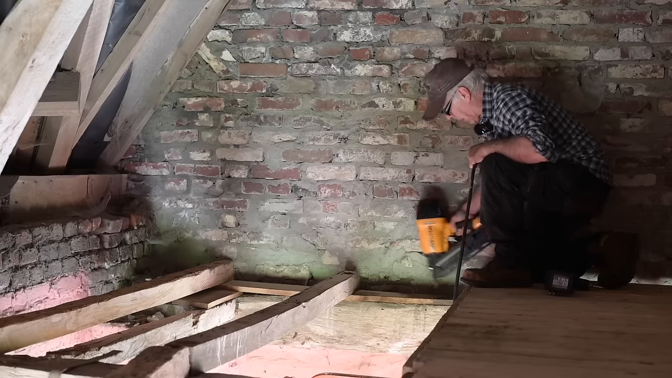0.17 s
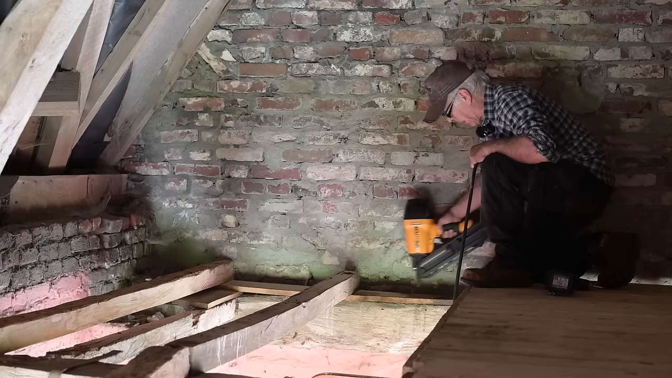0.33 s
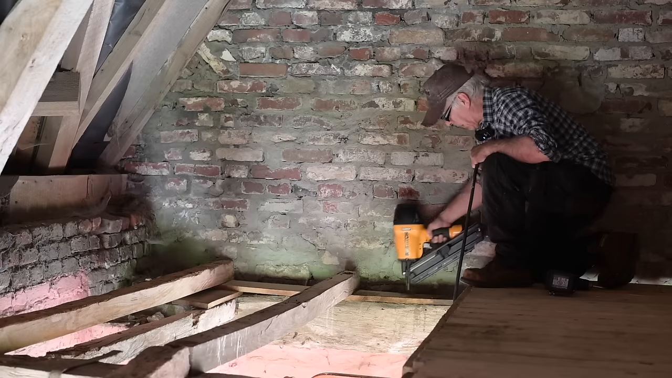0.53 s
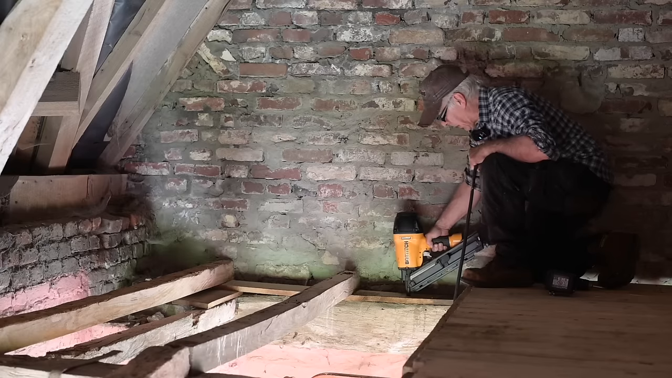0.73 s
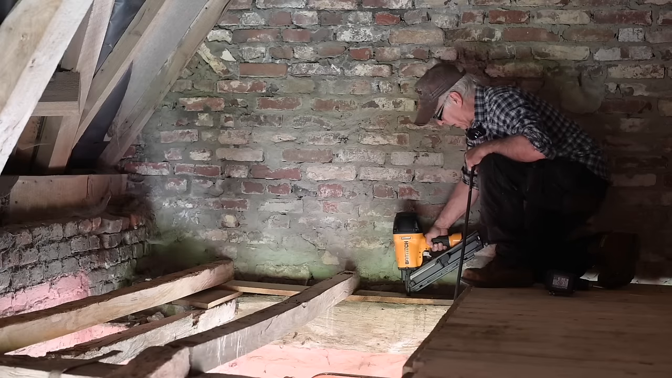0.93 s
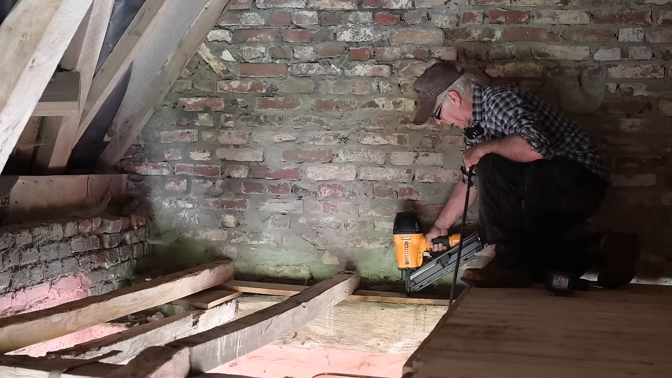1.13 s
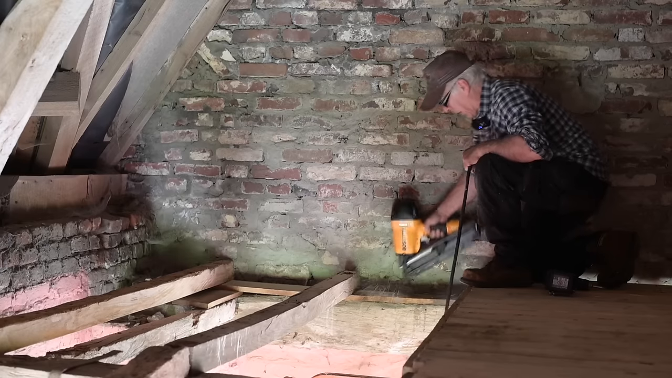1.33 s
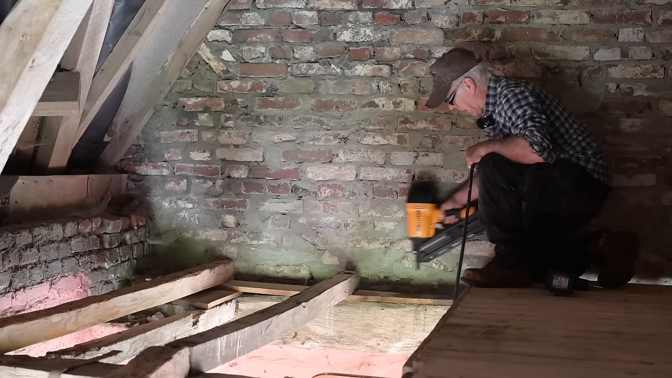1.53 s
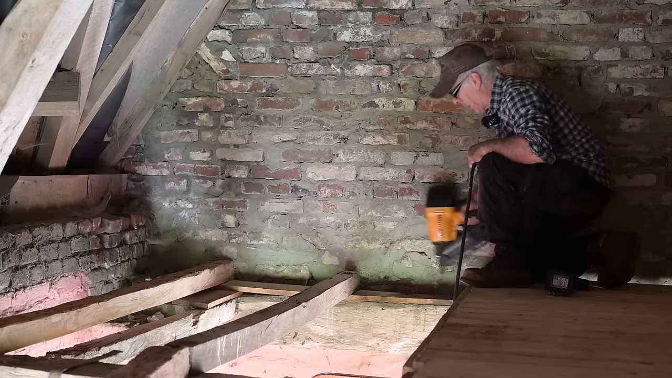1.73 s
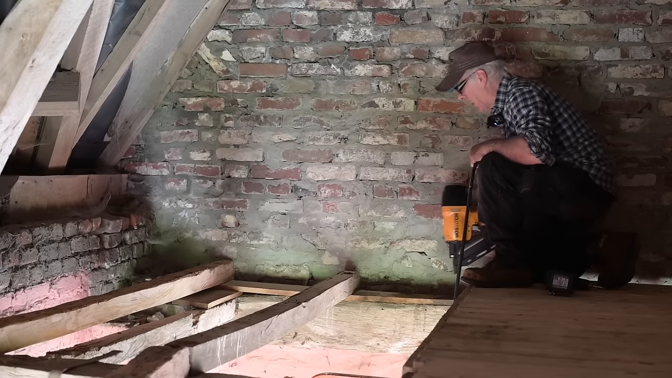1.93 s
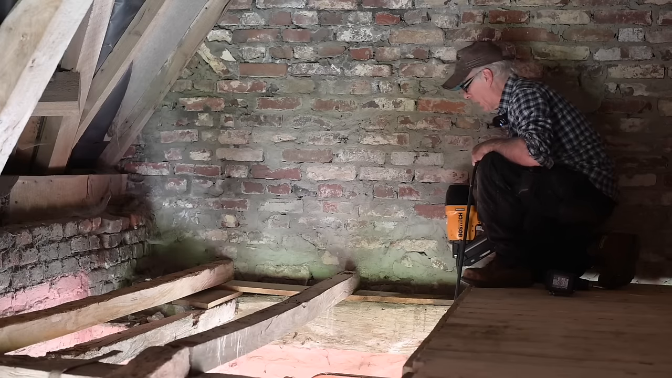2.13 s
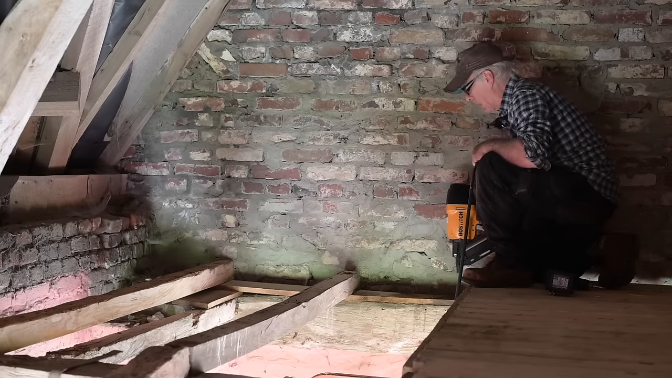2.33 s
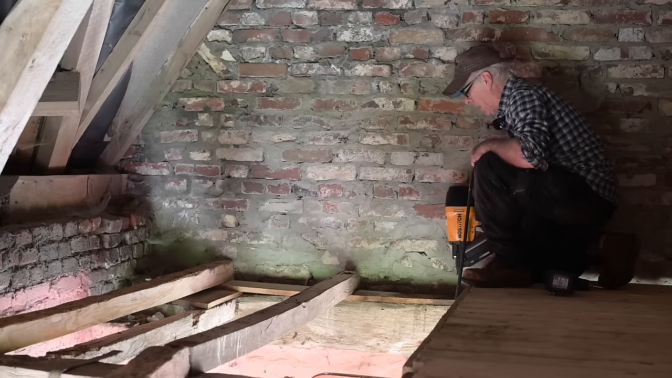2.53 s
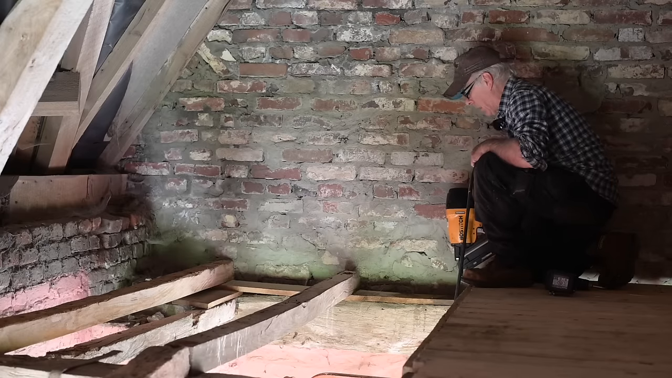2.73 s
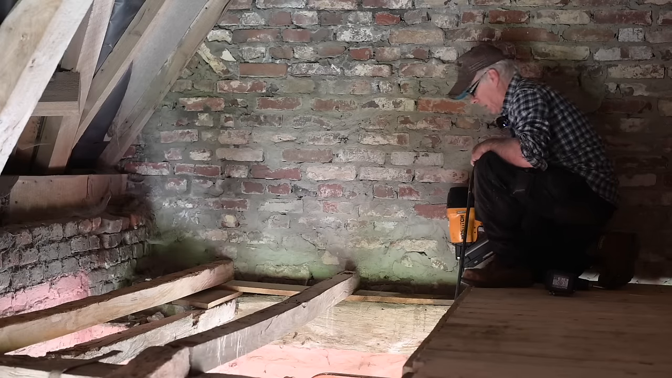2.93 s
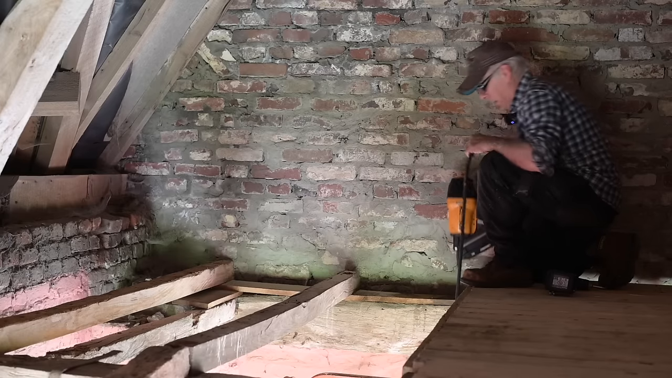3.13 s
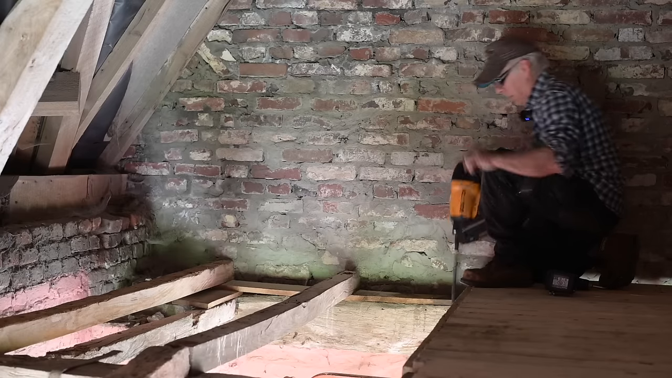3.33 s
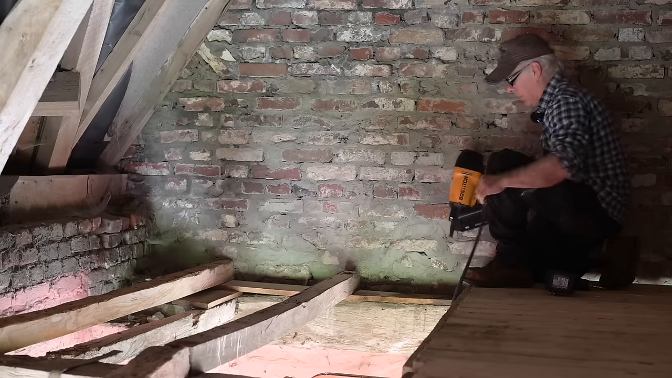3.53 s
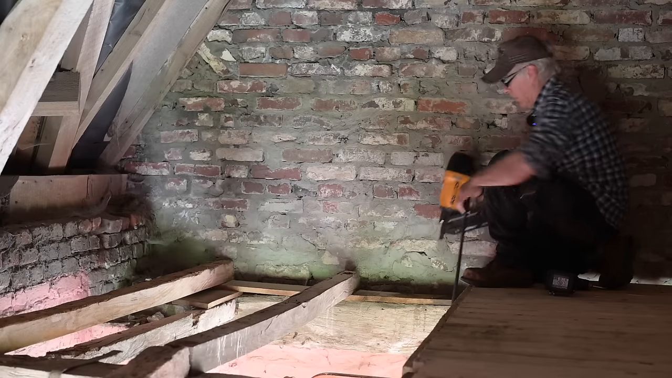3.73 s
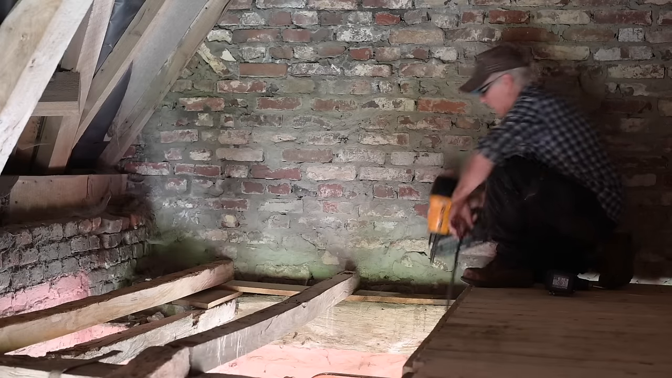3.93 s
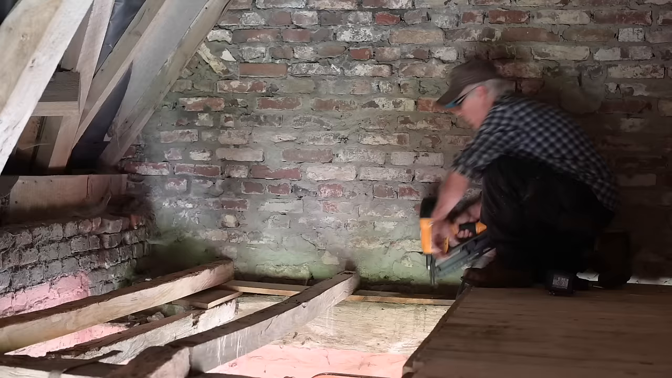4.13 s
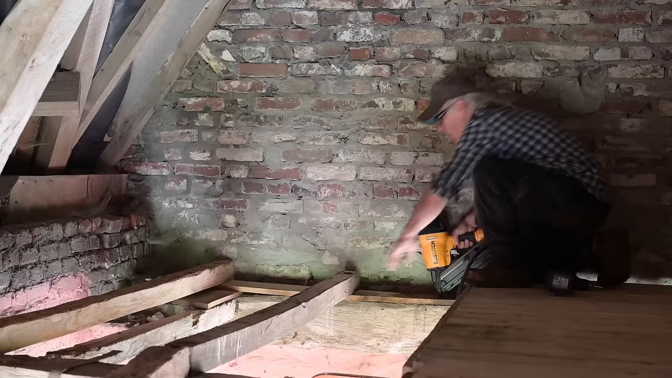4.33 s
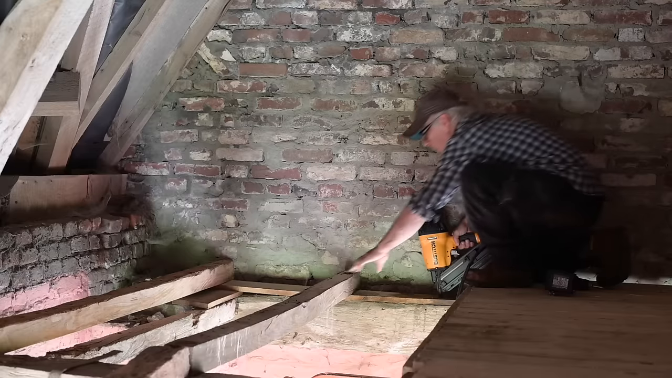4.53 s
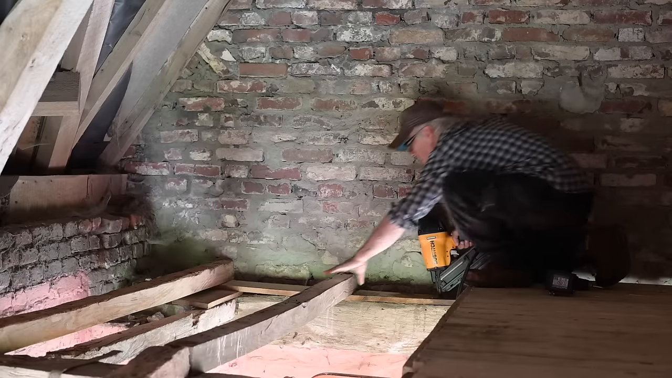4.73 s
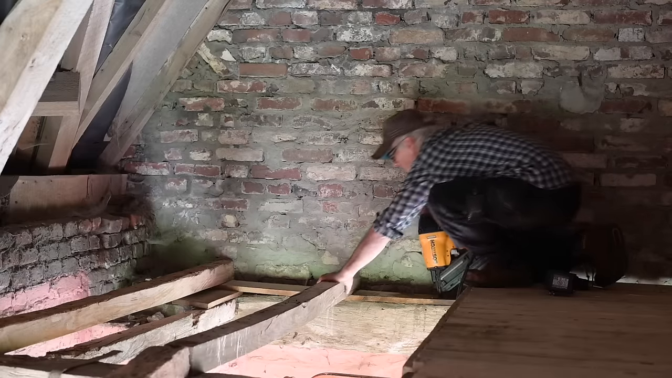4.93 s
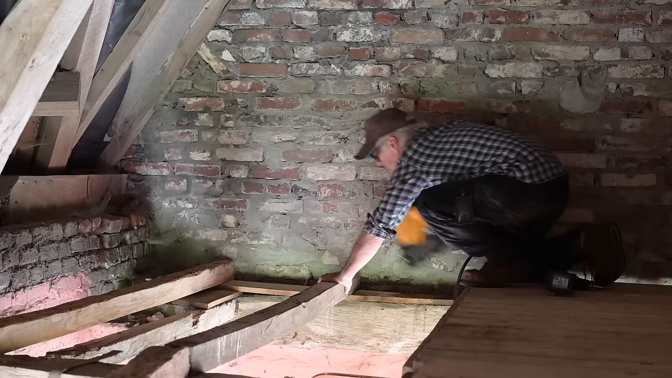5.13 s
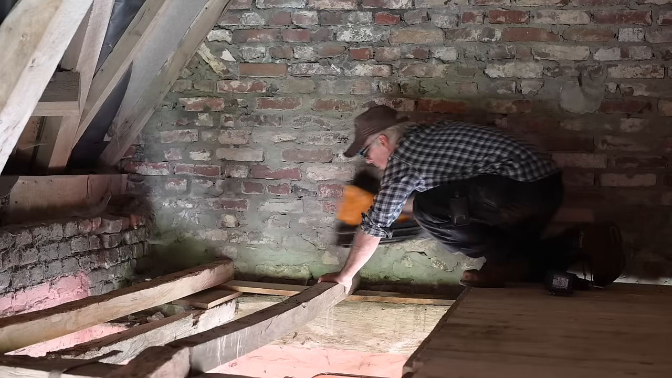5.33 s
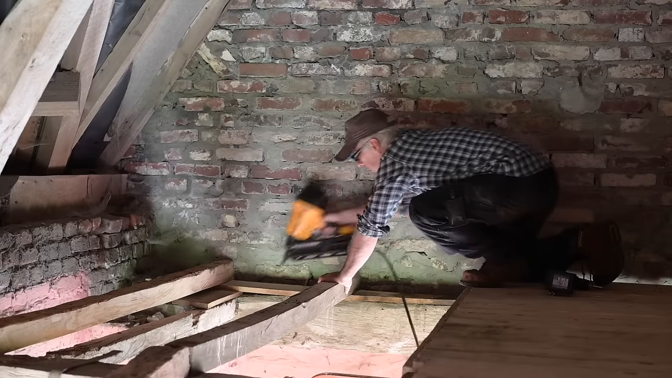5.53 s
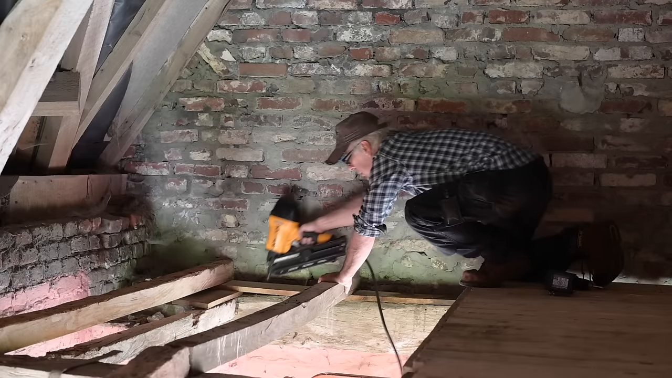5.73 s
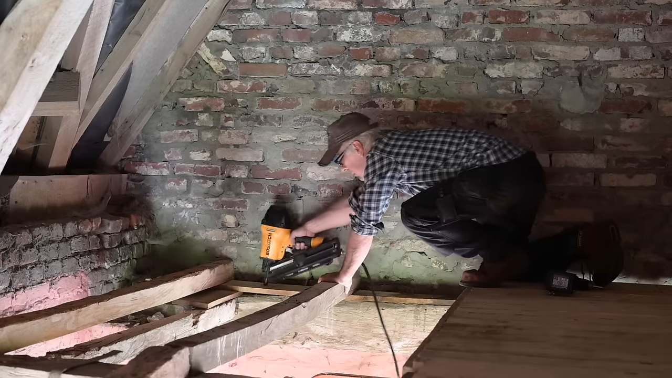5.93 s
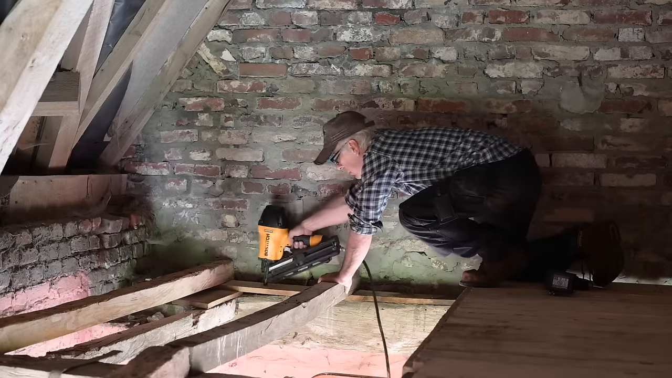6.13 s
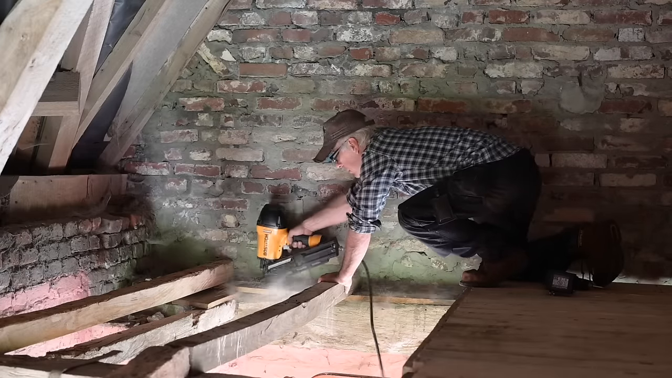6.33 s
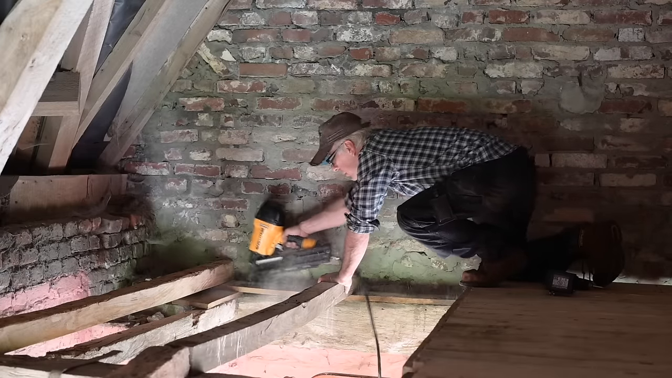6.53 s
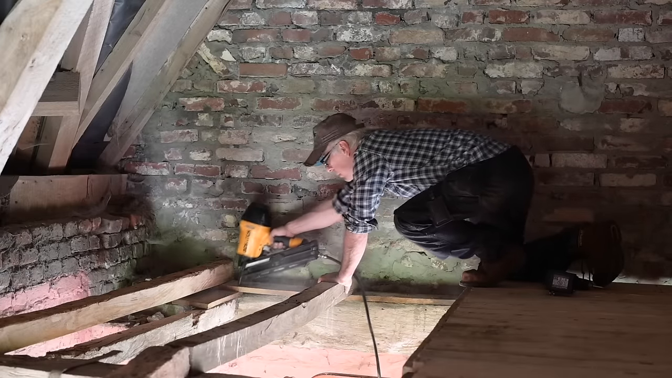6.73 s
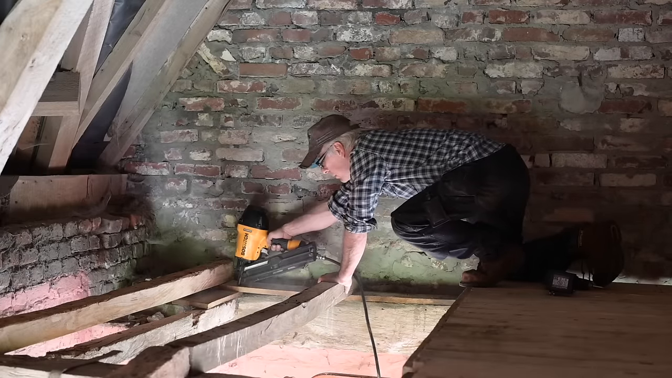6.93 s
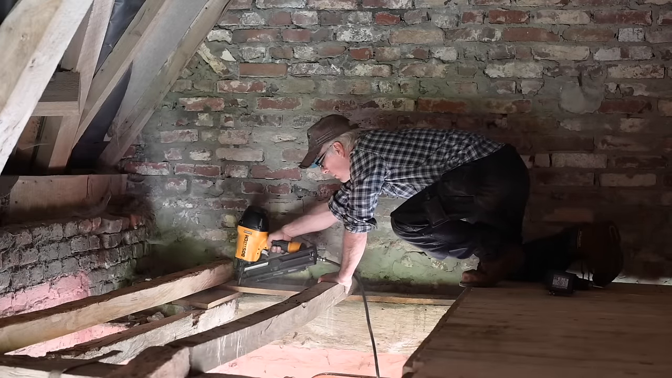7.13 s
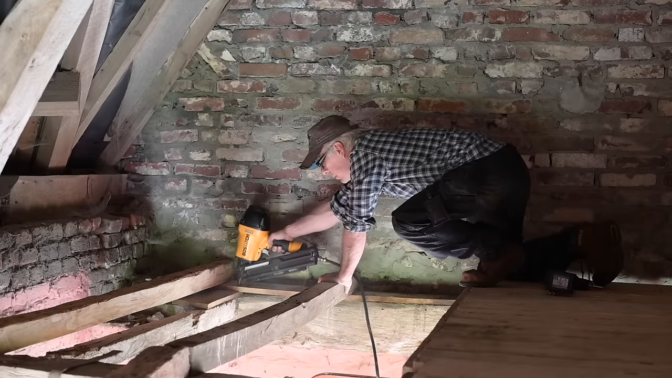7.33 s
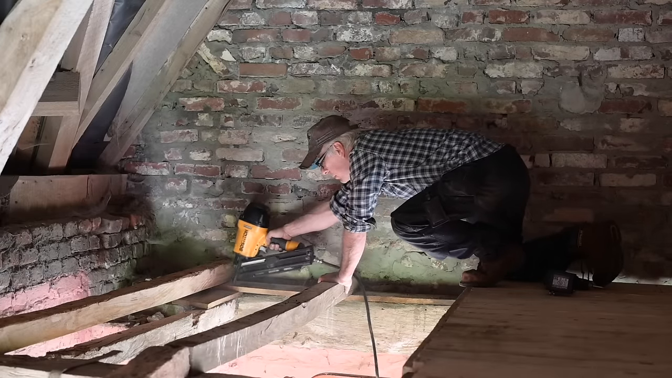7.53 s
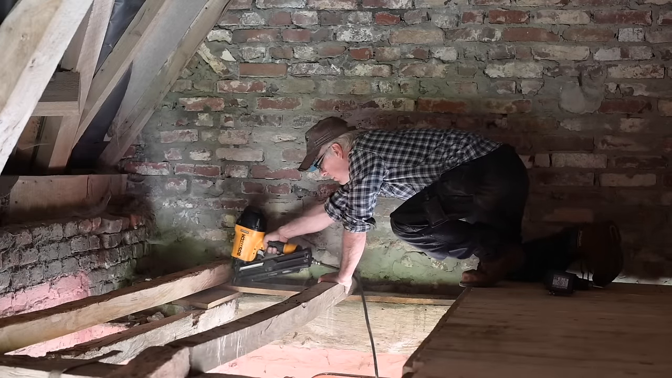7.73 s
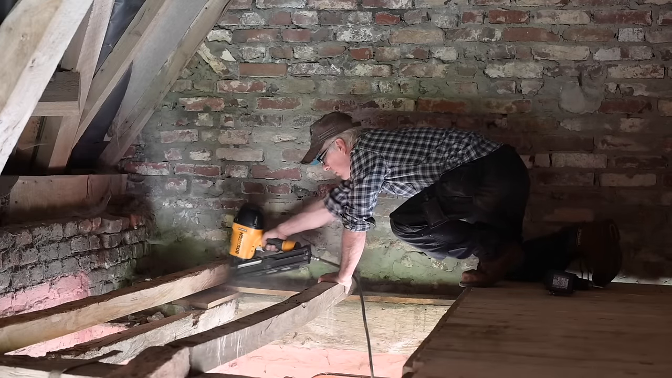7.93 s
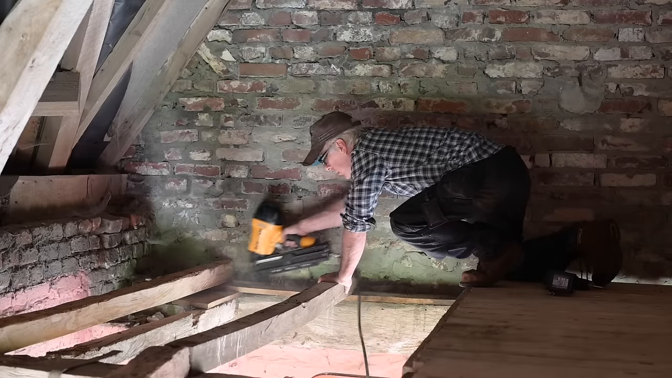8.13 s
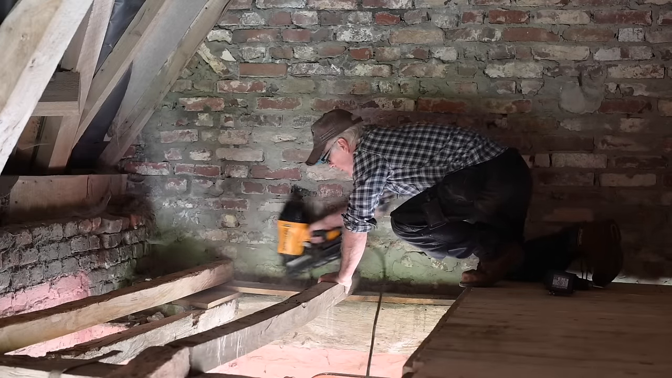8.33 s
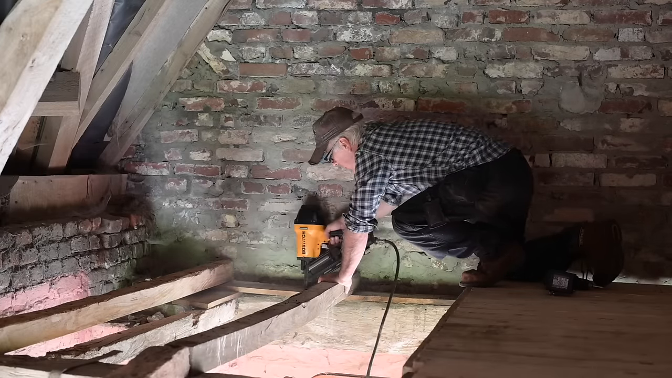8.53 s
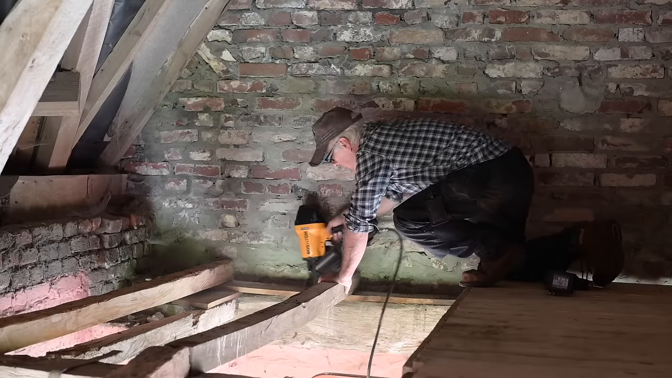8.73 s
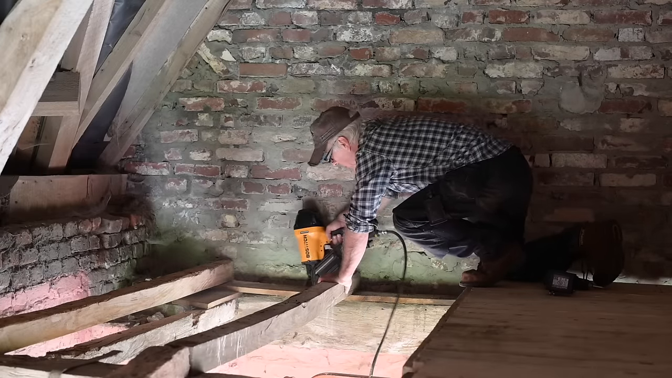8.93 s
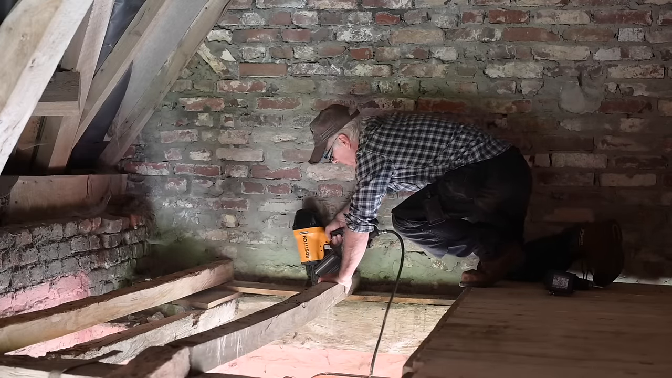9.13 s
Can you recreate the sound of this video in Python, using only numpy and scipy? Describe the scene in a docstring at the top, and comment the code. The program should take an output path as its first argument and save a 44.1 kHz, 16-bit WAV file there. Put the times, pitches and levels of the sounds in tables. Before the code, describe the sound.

Pneumatic nailer fires three overloaded, booming shots into timber in a brick loft, with wood knocks, steel clicks and a faint compressor drone between.

```python
"""A pneumatic nailer fires into roof timbers in a brick loft; its blows, booms and air blasts overload the input.
Between shots its nose and magazine land on wood, and loose parts click: shaped noise rings planks and steel.
Soft floor bumps and rustling cloth are noise bursts and swells.
A piston machine, probably the air compressor, drones as a comb of shaft orders over a faint whistling hiss."""
import sys
import numpy as np
from scipy import signal
from scipy.fft import rfft, irfft, next_fast_len
from scipy.io import wavfile
from scipy.ndimage import map_coordinates

SR = 44100
rng = np.random.default_rng(int(sys.argv[2]) if len(sys.argv) > 2 else 0)


def generate_wav(sig):
    """Save sig (samples, or channels by samples) to the path in sys.argv[1] as 16-bit PCM at SR."""
    pcm = np.round(np.clip(np.atleast_2d(sig).T, -1, 1) * 32767).astype(np.int16)
    wavfile.write(sys.argv[1], SR, pcm)


N = 408366
LEAD = SR  # samples kept ahead of time zero, for sounds that are already ringing
AGE = np.arange(SR) / SR  # seconds since a blow
SHORT = 2 ** 14  # samples that hold one blow and its ringing

# nailer shots: t/s, driver blow level/dB, timber boom level/dB, boom centre f/Hz, joist thud level/dB,
# ring time ratio, room level/dB, piston return delay/s, return level/dB
SHOT_EVENTS = [(-.135, 5, 3, 957, -2, 1.16, -14.5, 0.065, 2), (1.2293, 3, 2.5, 450, -4, 0.73, -17, .065, 1),
               (6.2226, 0, 11, 488.4, -7, 0.86, -14, .07, 2),
               (7.862, -0.5, 9.5, 1030, -8, 1.03, -14.5, 0.077, 0.5)]
# spectrum of a plank's knock: f/Hz, relative level/dB
KNOCK_SPECTRUM = [(60, -35), (200, -7), (400, 1.5), (900, -0.5), (1500, -11), (4000, -34.5)]
# spectrum of the joists' thud: f/Hz, relative level/dB
THUD_SPECTRUM = [(40, -39), (90, -12), (170, 0.5), (330, -1.5), (480, -8), (750, -14.5), (1500, -35.5)]
# position in the loft: t/s, share of the way from the wall out over the beams (0-1)
REACH_POINTS = [(0, .25), (1.3, 0.42), (1.9, 0), (3.2, 0), (4.9, .85), (6.4, 1), (9.26, 0.98)]


def amp(db):
    """Decibels to gain."""
    return 10 ** (np.asarray(db) / 20)


def unit(x):
    """Scale to rms 1."""
    return x / np.sqrt(np.mean(x ** 2) + 1e-20)


def along(points, hz):
    """(Hz, value) points read on a log frequency axis."""
    f, v = np.transpose(points)
    return np.interp(np.log(hz + 1), np.log(f + 1), v)


def curve(rows):
    """(s, value) rows as one value per sample."""
    return np.interp(np.arange(N) / SR, *np.transpose(rows))


def wobble(rate):
    """A random curve with rate knots a second, held in steps of 100 samples."""
    knots = rng.standard_normal(int(N * rate / SR) + 4)
    steps = map_coordinates(knots, [np.arange(0, N, 100) * rate / SR])
    return steps.repeat(100)[:N]


def noise(spectrum, size=SR):
    """Coloured noise of rms 1: the spectrum's levels with random phases."""
    hz = np.fft.rfftfreq(size, 1 / SR)
    phases = np.exp(2j * np.pi * rng.random(len(hz)))
    return unit(irfft(amp(along(spectrum, hz)) * phases, size))


def fade(t60, attack):
    """A quick rise, then an exponential decay; both times in seconds."""
    return np.exp(-np.log(1000) * AGE / t60) * (1 - np.exp(-AGE / attack))


def burst(spectrum, envelope, peak_hz=1000, peak_db=0, q=5):
    """A brief chatter of contact forces rings a body with this spectrum and one outstanding resonance."""
    hz = np.fft.rfftfreq(SHORT, 1 / SR)
    # folding the cepstrum makes the body answer only after the force
    cepstrum = irfft(np.log(amp(along(spectrum, hz))))
    fold = np.r_[1, np.full(SHORT // 2 - 1, 2), np.zeros(SHORT // 2)]
    body = np.exp(rfft(cepstrum * fold))
    damping = 1j * hz * peak_hz / q
    resonance = damping / (peak_hz ** 2 - hz ** 2 + damping)
    force = rng.standard_normal(SHORT) * envelope[:SHORT]
    sound = irfft(rfft(force) * body * (1 + (amp(peak_db) - 1) * resonance))
    # the burst carries the energy of its envelope
    return np.pad(sound, (0, SR - SHORT)) * np.linalg.norm(envelope) / np.linalg.norm(sound)


def ring(modes, life, attack, scatter_db):
    """Struck modes, a little different at every blow; life stretches their decay."""
    hz, db, t60 = np.transpose(modes)[:, :, None]
    size = amp(db + scatter_db * rng.standard_normal(db.shape))
    waves = np.sin(2 * np.pi * (hz * AGE + rng.random(hz.shape))) * fade(t60 * life, attack)
    return (size * waves).sum(0) / np.linalg.norm(size)


def add(track, s, sound):
    """Mix a sound into a track at time s."""
    part = track[LEAD + round(s * SR):][:len(sound)]
    part += sound[:len(part)]


def in_loft(x, wet_db, gap=.006, late_db=-24):
    """The answer of brick and roof: treble dies first and a faint part lingers twice as long."""
    # main decay of the loft: f/Hz, t60/s
    loft_decay = [(60, 0.66), (200, 0.42), (600, 0.47), (1200, 0.43), (2500, .36), (6000, 0.3),
                  (10000, .21), (16000, 0.19)]
    hz, t, z = signal.stft(rng.standard_normal(SR), SR, nperseg=256)
    decay = np.exp(-np.log(1000) * t / along(loft_decay, hz)[:, None])
    tail = signal.istft(z * (decay + amp(late_db) * np.sqrt(decay)), SR, nperseg=256)[1][:SR]
    # the answer swells in after a short gap
    tail = tail * (1 - np.exp(-(AGE / gap) ** 2))
    return x + amp(wet_db) * signal.fftconvolve(x, tail / np.linalg.norm(tail))[:SR]


def shots(drive_delay=.009, vent_peak=0.036, vent_rise=0.023, vent_fall=0.025, bounce=.018, bounce_db=-6):
    """The driver fires, the nail slams into the beam, the air vents and the piston thumps back and bounces."""
    # spectrum of the driver blow: f/Hz, relative level/dB
    blow_spectrum = [(25, -30), (70, -14.5), (200, 8.5), (500, 3.5), (1000, -12), (2000, -16),
                     (8000, -23.5), (16000, -35)]
    # spectrum of the timber's boom: f/Hz, relative level/dB
    boom_spectrum = [(25, -42.5), (80, -19.5), (170, -7.5), (500, 0.5), (1100, -5.5), (1700, -10.5),
                     (4000, -19), (9000, -26), (16000, -44.5)]
    # spectrum of the vented air: f/Hz, relative level/dB
    exhaust_spectrum = [(200, -10.5), (1000, -7), (2200, -2.5), (3500, 3.5), (7500, -0.5), (9800, -4),
                        (11500, -13.5), (16000, -22.5)]
    # beam modes: f/Hz, relative level/dB, t60/s at ring time ratio 1
    timber_modes = [(177, -2, .4), (228, -6, .3), (323, -3, .28), (385, -6, .3), (470, 0, .34),
                    (580, -3, .32), (654, -4, .32), (749, -4, .3), (941, -5, .28), (1082, -3, .3),
                    (1137, -7, .3), (1300, -8, .28), (1600, -11, .24), (1680, -10, .24)]
    exhaust_db = -2.5  # every shot vents the same charge of air
    track = np.zeros(LEAD + N)
    for s, blow_db, boom_db, boom_hz, joist_db, life, room_db, back, back_db in SHOT_EVENTS:
        blow = burst(blow_spectrum, fade(t60=0.03, attack=0.00014))
        add(track, s, amp(blow_db) * in_loft(blow, wet_db=-16.0))

        boom = burst(boom_spectrum, fade(t60=0.15 * life, attack=0.0014), boom_hz, peak_db=5, q=0.81)
        beam = amp(-13.5) * ring(timber_modes, life, attack=0.0018, scatter_db=0.5)
        add(track, s + drive_delay, amp(boom_db) * in_loft(boom + beam, room_db))

        # the recoil shakes the joists under the floor
        joists = burst(THUD_SPECTRUM, fade(t60=0.17, attack=0.0073), peak_hz=162.5, peak_db=18.0, q=3.6)
        add(track, s + drive_delay, amp(joist_db) * in_loft(joists, wet_db=-10.0))

        # the exhaust swells as the valve opens and sinks as the cylinder empties
        flow = np.exp(-((AGE - vent_peak) / np.where(AGE < vent_peak, vent_rise, vent_fall)) ** 2)
        add(track, s, amp(exhaust_db) * in_loft(noise(exhaust_spectrum) * flow, wet_db=-18.5))

        for delay, db in (back, back_db), (back + bounce, back_db + bounce_db):
            thump = burst(KNOCK_SPECTRUM, fade(t60=0.03, attack=0.00065), peak_hz=477.0, peak_db=11, q=15)
            add(track, s + delay, amp(db) * in_loft(thump, room_db))
    return track[LEAD:]


def wood(db, knock_hz, thud_hz, thud_db, thud_cycles=34):
    """A contact knocks the plank and thuds in the joists below; thud_db is relative to the knock."""
    gentle_db = -35  # knocks below this level are more push than blow
    # a gentle touch takes hold slowly and scuffs on; a hard knock is over at once
    gentle = 1 / (1 + amp(db - gentle_db) ** 2)
    contact = fade(t60=.046 + 0.044 * gentle, attack=.0004 + 0.0046 * gentle)
    knock = burst(KNOCK_SPECTRUM, contact, knock_hz, peak_db=12.5, q=5)
    # deeper thuds ring for longer
    thud = burst(THUD_SPECTRUM, fade(thud_cycles / thud_hz, attack=0.0056), thud_hz, peak_db=11.5, q=9)
    return amp(db) * (in_loft(knock, wet_db=-14) + amp(thud_db) * in_loft(thud, wet_db=-9))


def steel(clack_db, clack_hz, tick_db):
    """Steel meets steel: a clack, a short ring of the nailer's body and a bright tick from the hard edge."""
    # spectrum of the clack: f/Hz, relative level/dB
    clack_spectrum = [(300, -18.5), (1200, -6.5), (2000, 1), (4000, -1.5), (6000, -6), (10000, -21),
                      (16000, -37.5)]
    # spectrum of the tick: f/Hz, relative level/dB
    tick_spectrum = [(1000, -23), (3500, -8.5), (5000, -2.5), (8500, 2), (10000, -9), (11500, -16),
                     (16000, -21.5)]
    # modes of the nailer's body: f/Hz, relative level/dB before scatter, t60/s
    body_modes = [(2137, 0, .03), (2875, -1, .022), (3348, -2, .028), (5033, -2, .03), (6729, -4, .028),
                  (8096, -3, .025)]
    clack = burst(clack_spectrum, fade(t60=0.024, attack=0.0012), clack_hz, peak_db=8.5, q=3.9)
    body = amp(-15.5) * ring(body_modes, 1, attack=0.00078, scatter_db=8.0)
    tick = burst(tick_spectrum, fade(t60=0.017, attack=0.00076))
    return amp(clack_db) * in_loft(clack + body + amp(tick_db) * tick, wet_db=-19.5)


def landings():
    """The nose meets the timber, the magazine claps down just after it, and the nailer rocks once and settles."""
    # set-downs on timber: t/s, nose knock level/dB, nose knock f/Hz, thud f/Hz, magazine clack level/dB,
    # magazine clack f/Hz, tick level over clack/dB, clap delay/s, settle delay/s, settle loss under landing/dB
    set_downs = [(0.6698, -15.5, 1000, 197, -16, 3710, -6, 0.0068, .0378, 0),
                 (4.3294, -16, 920, 323, -11, 3150, -10, 0.0022, .028, 23),
                 (5.8563, -15.5, 550, 380, -20.5, 4700, 1, 0.0074, 0.038, 4),
                 (6.786, -23.5, 850, 333.3, -24, 3850, -4, 0.008, .0608, 8.5),
                 (7.6156, -22, 745, 369, -22, 4070, 1, .0062, .0486, 3.5),
                 (8.8122, -14.5, 620, 352, -1.5, 2026, -28.5, 0.014, 0.063, 21.5)]
    # the nose clack lies midway between knock and magazine clack in dB, plus nose_db
    nose_hz, nose_db, nose_thud_db = 1500, -4.5, -17.5
    # the magazine's knock against that of the nose: level and pitch
    clap_db, clap_ratio, clap_thud_db = -7.5, .7, -3
    # the last rock back onto the wood
    settle_clack_hz, settle_knock_hz, settle_knock_db, settle_thud_db = 2300, 557, -6, -2
    track = np.zeros(LEAD + N)
    for s, knock_db, knock_hz, thud_hz, clack_db, clack_hz, tick_db, clap, settle, loss_db in set_downs:
        add(track, s, wood(knock_db, knock_hz, thud_hz, nose_thud_db))
        add(track, s, steel((knock_db + clack_db) / 2 + nose_db, nose_hz, tick_db))
        add(track, s + clap, wood(knock_db + clap_db, knock_hz * clap_ratio, thud_hz, clap_thud_db))
        add(track, s + clap, steel(clack_db, clack_hz, tick_db))
        rock_db = knock_db - loss_db + settle_knock_db
        add(track, s + settle, wood(rock_db, settle_knock_hz, thud_hz, settle_thud_db))
        add(track, s + settle, steel(clack_db - loss_db, settle_clack_hz, tick_db))
    return track[LEAD:]


def nose_taps():
    """The steel nose alone taps the beam while it is aimed: wood knock and steel clack together."""
    # taps: t/s, knock level/dB, clack level/dB, clack f/Hz
    tap_events = [(8.4742, -23, -11, 2170), (8.6837, -45.5, -33.5, 2170), (8.9466, -27.5, -24, 1730),
                  (9.1167, -32.5, -29.5, 4060)]
    track = np.zeros(LEAD + N)
    for s, knock_db, clack_db, clack_hz in tap_events:
        knock = wood(knock_db, knock_hz=620, thud_hz=226.7, thud_db=-4.5)
        add(track, s, knock + steel(clack_db, clack_hz, tick_db=-19.5))
    return track[LEAD:]


def rattles():
    """The nail strip and trigger slip faintly, then snap home without touching wood."""
    # snaps: t/s, clack level/dB, clack f/Hz, tick level over clack/dB
    snap_events = [(.1072, -32.5, 3150, -8), (5.031, -12.5, 4870, 2.5), (6.3495, -11, 5700, -7.5),
                   (6.4692, -26.5, 4730, -3), (7.4626, -21.5, 4000, -4.5), (7.959, -13, 2370, -3.5),
                   (7.966, -16, 3230, -5.5)]
    slip_s = .016  # lead of the slip over the snap, seconds
    track = np.zeros(LEAD + N)
    for s, db, hz, tick_db in snap_events:
        add(track, s - slip_s, steel(clack_db=-38.5, clack_hz=2400, tick_db=-11.5))
        add(track, s, steel(db, hz, tick_db))
    return track[LEAD:]


def floor_bumps():
    """The worker's shifting weight bumps the plank floor softly and jiggles the nailer a little."""
    # bumps: t/s, knock level/dB
    bump_events = [(0.8277, -37.5), (2.5437, -44.5), (3.3043, -32), (3.4043, -37.5), (4.09, -36),
                   (4.13, -31.5), (4.1463, -40)]
    track = np.zeros(LEAD + N)
    for s, db in bump_events:
        bump = wood(db, knock_hz=490, thud_hz=273, thud_db=-8)
        jiggle = steel(db - 17.5, clack_hz=1400, tick_db=-22)
        add(track, s, bump + jiggle)
    return track[LEAD:]


def rustles(flutter_db=2):
    """Clothes and hose slide as the worker moves: noise in soft, uneven swells."""
    # swells: middle t/s, half length/s, level/dB before flutter
    swell_events = [(2.716, .13, -61.5), (3.25, 0.13, -56.5), (3.64, .2, -61.5), (4.434, 0.16, -58.5),
                    (4.86, .03, -59), (5.002, 0.029, -52)]
    # spectrum of rubbing cloth: f/Hz, relative level/dB
    cloth_spectrum = [(100, -9), (600, 6.5), (1600, -2), (4000, 0), (9000, -8), (12000, -26), (16000, -36)]
    t = np.arange(N) / SR
    swell = sum(amp(db) * np.exp(-((t - s) / half) ** 2) for s, half, db in swell_events)
    cloth = noise(cloth_spectrum, size=next_fast_len(N))[:N]
    return swell * amp(flutter_db * wobble(25)) * cloth


def compressor(scatter_db=2, waver_db=-0.5, drift=0.00054, count=66):
    """Every turn of the shaft repeats one clatter, smeared by the building into a throbbing comb of lines."""
    # outstanding shaft orders: order, level by the wall/dB, level out over the beams/dB
    strong_orders = [(4, -65, -58), (6, -60, -59.5), (8, -61, -73.5), (9, -68.5, -56), (22, -65, -64),
                     (35, -61, -61), (41, -63.5, -68), (42, -70.5, -59.5), (46, -63, -64.5)]
    # comb lifted where the casing rings: f/Hz, level per line/dB before scatter
    casing = [(20, -113), (47, -73.5), (70, -84), (120, -68.5), (190, -67.5), (240, -77), (700, -79),
              (770, -77.5), (820, -64.5), (1000, -70.5), (1130, -72.5), (1220, -80), (1550, -90.5)]
    shaft_hz = 23.58  # mean turns a second
    turns = np.cumsum(shaft_hz * (1 + drift * wobble(0.87))) / SR
    orders = np.arange(count)
    grid = np.linspace(0, 1, 2048)  # one turn
    # the upper orders stay partly in step, so the clatter chugs once a turn
    smear = np.where(orders * shaft_hz > 700, .58, 1)
    phases = (smear * rng.random(count))[:, None]
    waves = np.sqrt(2) * np.sin(2 * np.pi * (np.outer(orders, grid) + phases))
    reach = np.clip(curve(REACH_POINTS), 0, 1)
    strong, *spots = np.transpose(strong_orders)
    drone = np.zeros(N)
    # crossfade between the two spots in the loft
    for strong_db, share in zip(spots, (1 - reach, reach)):
        db = along(casing, orders * shaft_hz) + scatter_db * rng.standard_normal(count)
        db[np.round(strong).astype(int)] = strong_db
        drone += share * np.interp(turns % 1, grid, amp(db) @ waves)
    return amp(waver_db * wobble(4)) * drone


def air(width_hz=85):
    """A faint hiss with thin whistles, as from a leaking hose coupling; it surges as the hose refills the nailer."""
    # spectrum of the hiss: f/Hz, relative level/dB
    hiss_spectrum = [(20, -27), (70, -10.5), (120, 9.5), (250, 4), (600, 4.5), (1050, 2), (1500, -3),
                     (2200, -3.5), (4200, -4.5), (6800, -11), (8500, -16.5), (10500, -21), (12500, -32),
                     (16000, -38)]
    # thin whistles in the hiss: f/Hz, level over the hiss/dB
    whistles = [(5620, -12.5), (6750, -18), (7850, -25.5)]
    hiss_db, hiss_reach_db = -57, 3  # by the wall; added out over the beams
    refill_db, refill_db_per_s = -47.5, 23  # level at the shot; its fall as the flow slows
    size, t = next_fast_len(N), np.arange(N) / SR
    hiss = noise(hiss_spectrum, size=size)[:N]
    for hz, db in whistles:
        narrow = [(hz - 4 * width_hz, -40), (hz, 0), (hz + 4 * width_hz, -40)]
        hiss = hiss + amp(db) * noise(narrow, size=size)[:N]
    leak = amp(hiss_db + hiss_reach_db * curve(REACH_POINTS) + .4 * wobble(8.9)) * hiss
    refill = sum((t > s) * amp(refill_db - refill_db_per_s * np.abs(t - s)) for s, *_ in SHOT_EVENTS)
    return leak + refill * noise(hiss_spectrum, size=size)[:N]


def scene():
    """One microphone feeds both channels."""
    nailer = shots() + landings() + nose_taps() + rattles()
    worker = floor_bumps() + rustles()
    mono = nailer + worker + compressor() + air()
    return np.array([mono, mono])


def record(dry):
    """The input saturates toward full scale on loud peaks, then a steep low-pass ends the band."""
    top_hz = 16000  # middle of a 300 Hz wide slope
    clipped = dry / (1 + dry ** 8) ** (1 / 8)
    size = next_fast_len(N + SR // 2)
    passband = np.clip((top_hz - np.fft.rfftfreq(size, 1 / SR)) / 300 + .5, 0, 1)
    return irfft(rfft(clipped, size) * passband, size)[:, :N]


dry = scene()
out = record(dry)
generate_wav(out)
```